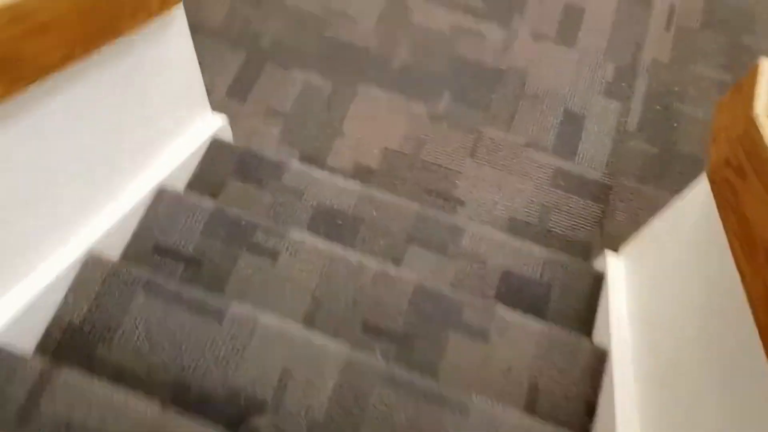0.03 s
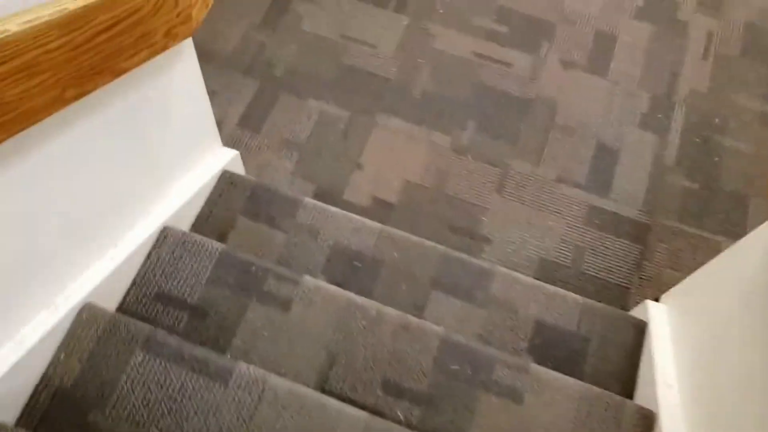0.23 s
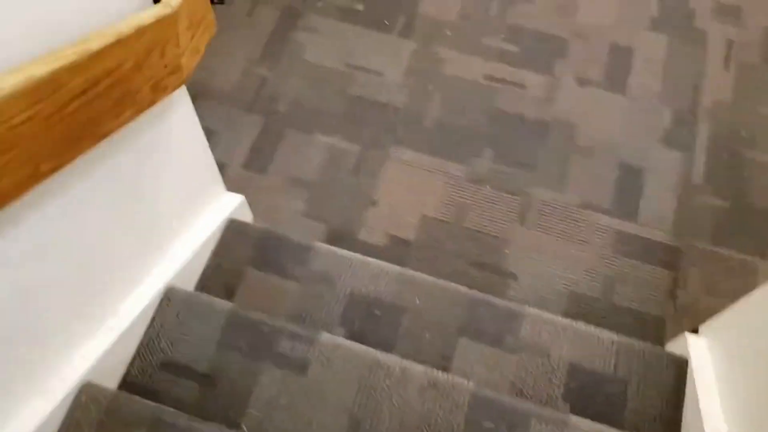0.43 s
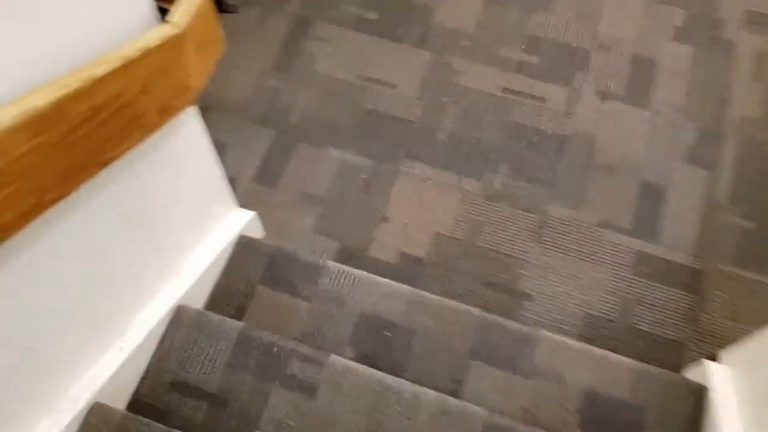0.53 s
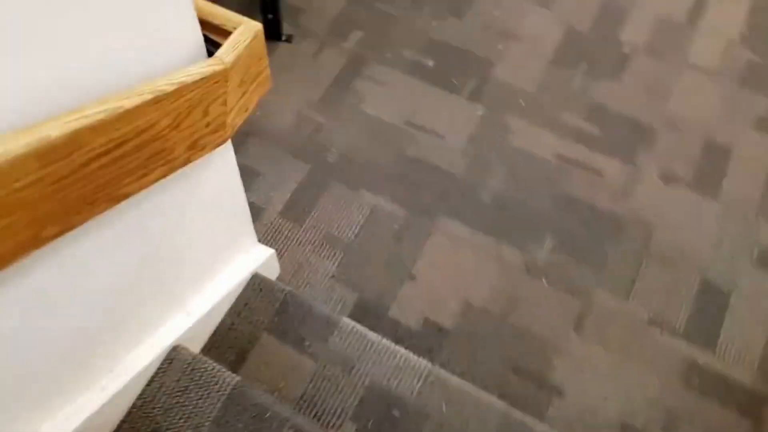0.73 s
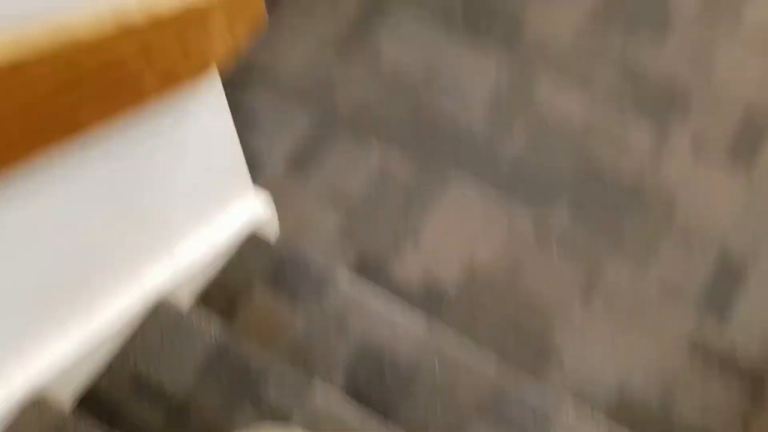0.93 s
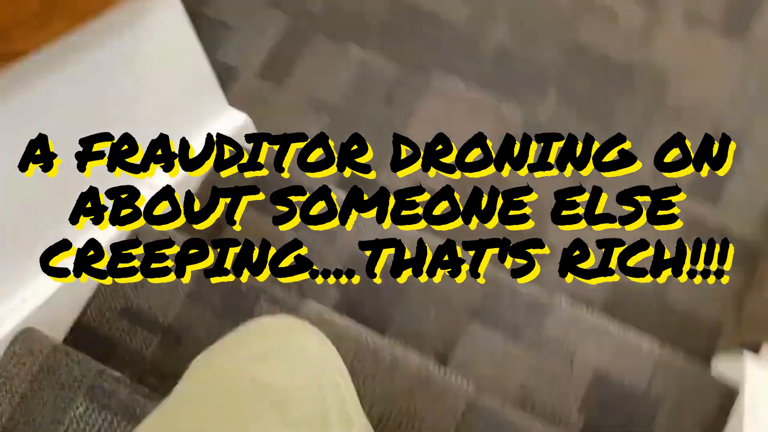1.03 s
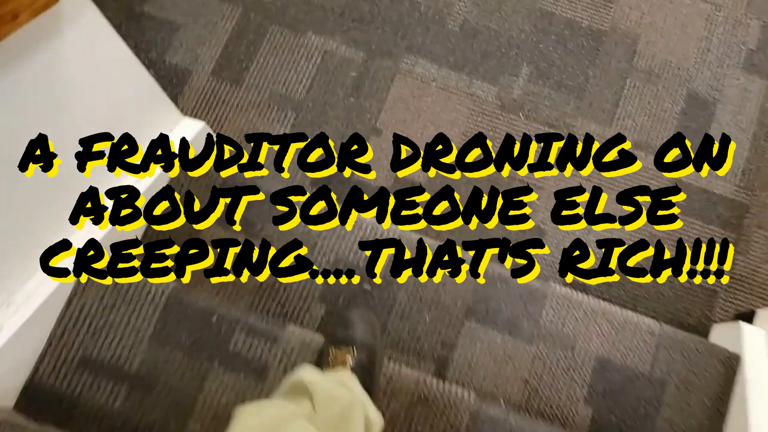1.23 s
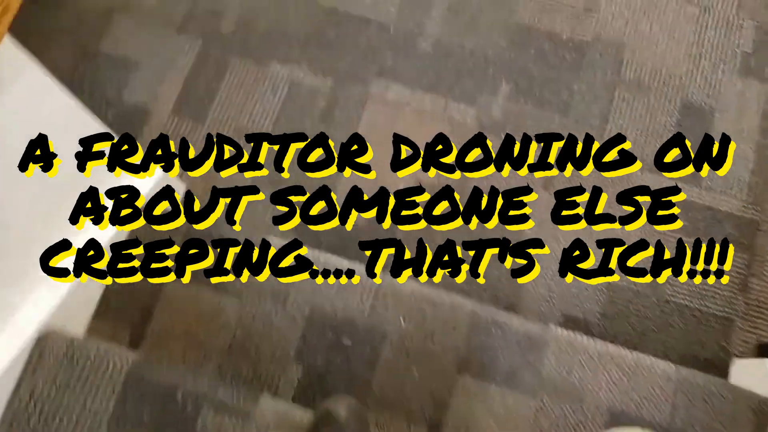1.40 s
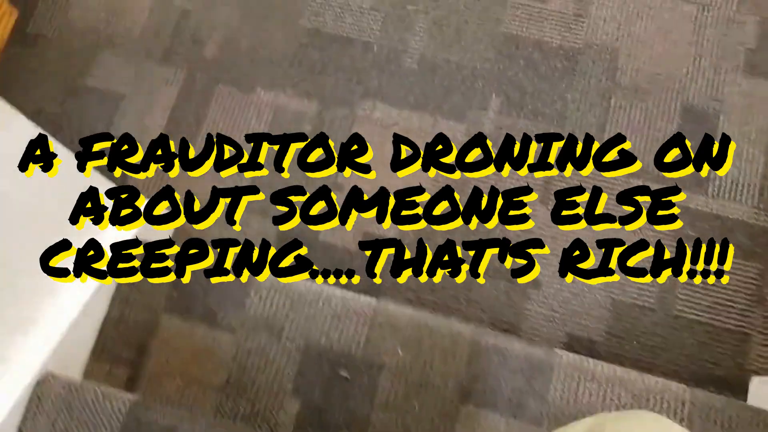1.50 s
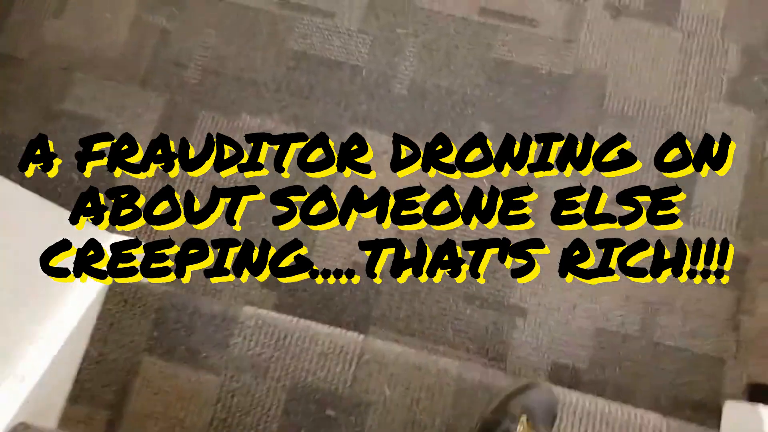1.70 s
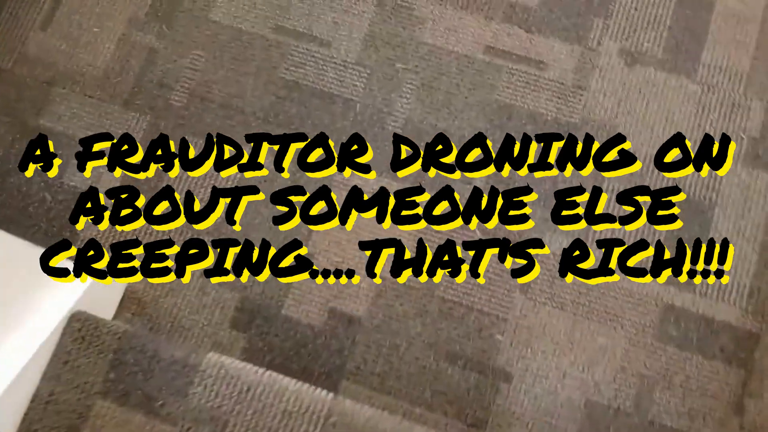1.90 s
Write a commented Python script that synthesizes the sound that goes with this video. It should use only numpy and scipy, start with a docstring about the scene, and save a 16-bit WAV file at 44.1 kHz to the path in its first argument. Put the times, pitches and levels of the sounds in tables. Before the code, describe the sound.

Three heavy footsteps go down carpeted wooden stairs, each a light clack and a dull boom, then a carpet brush. Trousers swish faintly and a hand bumps the walker's phone over a quiet indoor rumble.

```python
"""A carpeted wooden staircase: three heavy steps down, heard from a phone in the walker's hand.
At each step the sole clacks on the tread and the toe makes the stair and the stairwell boom;
then the sole brushes over the carpet and the heel settles. Trousers swish between the steps,
the hand bumps the phone, and the building rumbles quietly."""
import sys
import numpy as np
from scipy import signal
from scipy.fft import rfft, irfft
from scipy.io import wavfile
from scipy.ndimage import uniform_filter1d

SR = 44100
rng = np.random.default_rng(int(sys.argv[2]) if len(sys.argv) > 2 else 0)


def inscribe(sig):
    """Save sig as 16-bit PCM at rate SR to the path in sys.argv[1].

    A 1-D sig is mono; a 2-D sig holds one channel per row.
    Samples are clipped to [-1, 1] before scaling.
    """
    pcm = np.round(np.clip(np.atleast_2d(sig).T, -1, 1) * 32767)
    wavfile.write(sys.argv[1], SR, pcm.astype(np.int16))


N = 85995

# toe strikes: t/s, push/dB, contact/ms, boom/dB, tap/dB, tap pitch/Hz, carpet crush/dB,
# board ring/dB, tap contact/ms
STEPS = [(.4200, 0, 4.16, -40, -48, 1030, -70, -50, 1.25),
         (0.9454, 1, 3.68, -43, -52, 790, -54.5, -61, 4.5),
         (1.4959, 2, 3.2, -42, -40, 1230, -57.5, -48, 0.29)]
# heels settling: t/s, push/dB, contact/ms, boom/dB
HEELS = [(0.531, -7.5, 6.46, -49), (1.044, 1, 9, -45), (1.590, -4, 4.84, -55)]
BALL_DELAY_S = 0.0126  # the ball of the foot lands just after the toe


def undb(db):
    """Turn decibels into a gain to multiply by."""
    return 10 ** (np.asarray(db) / 20)


def curve(points):
    """Read a table of f/Hz, value at every frequency of the spectrum."""
    hz, value = np.array(points, float).T
    return np.interp(np.log(np.fft.rfftfreq(N, 1 / SR) + 1e-6), np.log(hz), value)


def bell(hz, width):
    """A bell shape of height 1 around one frequency."""
    return np.exp(-((np.fft.rfftfreq(N, 1 / SR) - hz) / width) ** 2)


def shade(x, db):
    """Turn each frequency up or down, with a filter that never rings ahead of the sound."""
    cepstrum = irfft(db * np.log(10) / 20, N)
    fold = 1 + np.sign(np.fft.fftfreq(N))
    response = np.atleast_2d(irfft(np.exp(rfft(cepstrum * fold)), N))
    return signal.fftconvolve(x, response[:, :N // 2], axes=1)[:, :N]


def brighten(x, db):
    """Turn the treble up or down."""
    return shade(x, db * curve([(2250, 0), (9000, 1)]))


def noise(spectrum):
    """Stereo noise of level 1 with the given tone colour."""
    # how alike left and right are: f/Hz, correlation
    likeness = [(60, 0.61), (400, 0.96), (800, 0.39), (1500, 0.017), (2500, 0.13), (4200, -0.16),
                (6500, -0.0035), (9000, 0.88), (15000, 0.91)]
    alike = np.clip(curve(likeness), -1, 1)
    mid, side = rfft(rng.standard_normal((2, N)))
    mid, side = mid * np.sqrt(1 + alike), side * np.sqrt(1 - alike)
    y = irfft(np.array([mid + side, mid - side]) * undb(curve(spectrum)), N)
    return y / y.std()


def wander(hz):
    """A smooth random wobble with a spread of 1."""
    hold = max(int(SR / hz), 2)
    y = uniform_filter1d(np.repeat(rng.standard_normal(N // hold + 1), hold), hold)[:N]
    return y / y.std()


def since(start):
    """Seconds gone by after a moment, zero before it."""
    return np.maximum(np.arange(N) / SR - start, 0)


def strike(start, rise, t60):
    """Loudness of a blow: a quick rise, then a fade of 60 dB every t60 seconds."""
    return np.minimum(since(start) / rise, 1) * np.exp(-np.log(1000) * since(start + rise) / t60)


def swells(strokes):
    """Loudness of rubbing strokes that swell and fade."""
    t = np.arange(N) / SR
    power = 0
    for at, db, rise, fall in strokes:
        shape = np.exp(np.where(t < at, -((t - at) / rise) ** 2, -since(at) / fall))
        power = power + (undb(db) * shape) ** 2
    return np.sqrt(power)


def ring(start, hz, t60):
    """One fading tone of a struck object."""
    t = since(start)
    return np.sin(2 * np.pi * hz * t) * np.exp(-np.log(1000) * t / t60)


def cushion(x, ms):
    """A soft contact spreads a blow over time, which dulls it."""
    length = ms * SR / 1000
    push = np.sin(np.pi * np.minimum(np.arange(int(length) + 1) / length, 1))
    return signal.fftconvolve(x, push / push.sum(), mode="same")


def building():
    """The building gives a steady low rumble and a faint hiss."""
    # tone colours of the rumble and the hiss: f/Hz, level/dB
    rumble = [(20, -11), (33, -14), (48, 7.5), (68, 0.5), (100, -3.5), (160, -8), (300, -13), (450, -22),
              (700, -39), (1500, -39), (6000, -72)]
    hiss = [(300, 2.5), (900, 1), (1500, 2), (2500, 0.5), (4500, -2.5), (7000, 4), (11000, 0), (15000, -6)]
    return undb(-58) * noise(rumble) + undb(-70) * noise(hiss)


def hand():
    """The hand bumps the phone, each time nearer one microphone; the phone rumbles as it shifts."""
    # bumps: t/s, left/dB, right/dB, f/Hz, ring time/s, contact/ms
    bumps = [(0.195, -25, -45.5, 82.4, 0.095, 4.7), (0.71, -46, -30, 71, 0.061, 4.8),
             (1.603, -62, -19.5, 103, 0.053, 2.9), (1.607, -46, -24.5, 332, 0.026, 2.05)]
    # tone colour of the shifting grip: f/Hz, level/dB
    grip = [(20, -26), (35, -10), (50, 5.5), (70, 4), (100, -12.5), (170, -22), (400, -35), (1200, -60),
            (4000, -100)]
    # shifts in the hand: peak t/s, level/dB, rise/s, fall/s
    shifts = [(.05, -49.5, 0.098, 0.17), (.375, -47, 0.085, 0.13), (.905, -47, 0.024, 0.042),
              (1.145, -43, 0.017, 0.039), (1.31, -49.5, 0.044, 0.14), (1.70, -53, 0.029, 0.67)]
    thuds = sum(undb([[left], [right]]) * cushion(ring(at, hz, t60), ms)
                for at, left, right, hz, t60, ms in bumps)
    return thuds + noise(grip) * swells(shifts)


def clothes():
    """Trouser legs swish as they pass, and clothing rubs dully as a leg swings; both flutter a little."""
    # tone colours of the bright swish and the dull rub: f/Hz, level/dB
    swish_colour = [(500, -22.5), (1200, -1), (2700, 6), (4500, 0), (7000, -2.5), (11000, -1.5),
                    (15000, -14.5)]
    rub_colour = [(100, 3), (200, -3.5), (310, 6.5), (420, -1), (600, -15), (800, -26.5), (1500, -30.5),
                  (4000, -26), (12000, -71)]
    # swishes: peak t/s, level/dB, rise/s, fall/s, left minus right/dB, treble/dB
    swishes = [(.008, -65, 0.016, 0.039, 2.5, -1.5), (0.221, -72, 0.059, 0.16, -1, -6),
               (.32, -67.5, 0.042, 0.076, -9, -12), (.53, -65.5, 0.055, 0.12, -4, 5.5),
               (.74, -64.5, 0.031, 0.083, -1, 3.5), (1.13, -72, 0.067, 0.095, -2, 8.5),
               (1.39, -77, 0.077, 0.21, 3, 6), (1.67, -68.5, 0.075, 0.05, -0.5, 4.5)]
    # leg swings: peak t/s, level/dB, rise/s, fall/s
    swings = [(.02, -67.5, 0.075, 0.3), (.22, -59.5, 0.055, 0.1), (.35, -56.5, .06, 0.056),
              (.61, -60, 0.037, 0.058), (1.23, -58.5, 0.094, 0.15), (1.73, -63.5, 0.15, 0.23)]
    swish = 0
    for *stroke, pan_db, treble_db in swishes:
        cloth = brighten(noise(swish_colour), treble_db)
        swish = swish + cloth * swells([stroke]) * undb([[pan_db / 2], [-pan_db / 2]])
    swish = swish * undb(1.6 * wander(hz=200))
    rub = noise(rub_colour) * swells(swings) * undb(1.9 * wander(hz=40.53))
    return swish + rub


def carpet():
    """Each step crushes the carpet fibres, then the sole brushes over them with a faint squeak."""
    # tone colour of the fibres: f/Hz, level/dB
    fibres = [(300, 8.5), (600, 7), (1000, 1.5), (1700, -2.5), (2700, -5), (4500, -8), (7000, -6.5),
              (11000, -9), (15000, -27)]
    # brushes of the sole: peak t/s, level/dB, rise/s, fall/s, squeak/Hz
    scuffs = [(0.487, -55.5, 0.056, 0.079, 3670), (.542, -55.5, 0.037, 0.016, 2470),
              (1.096, -58, 0.031, 0.021, 2600), (1.631, -57.5, 0.044, 0.019, 1730)]
    crush = sum(undb(db) * strike(at, rise=0.014, t60=0.77) for at, *_, db, _, _ in STEPS)
    out = brighten(noise(fibres), db=2) * crush
    for *stroke, hz in scuffs:
        squeak_db = 6.5 * bell(hz, width=hz / 4)
        out = out + shade(noise(fibres), squeak_db) * swells([stroke])
    grain = undb(wander(hz=350))
    return out * grain


def stairwell():
    """The stair and the walls ring on with a dull boom after each toe and heel."""
    # tone colour of the boom: f/Hz, level/dB
    boom = [(60, -23), (140, -3), (250, 4), (400, -3.5), (570, -7.5), (800, -18.5), (1300, -31),
            (2500, -27), (6000, -55), (14000, -83)]
    power = sum((undb(db) * strike(at, rise=0.004, t60=0.34)) ** 2 for at, _, _, db, *_ in STEPS + HEELS)
    return noise(boom) * np.sqrt(power)


def taps():
    """The rubber sole clacks just before the weight arrives; the boards ring and the walls answer."""
    # tones of the tread boards: f/Hz, ring time/s, level/dB
    board_tones = [(384, 0.097, 3.5), (500, 0.27, -3), (568, 0.17, 0.5), (620.4, 0.33, -7.5),
                   (920, 0.15, -19), (1142, 0.18, -8), (1274, 0.047, -7)]
    out = 0
    for at, _, _, _, tap_db, hz, _, board_db, contact_ms in STEPS:
        touch = at - .0025
        # tone colour of the tap, strongest at its pitch: f/Hz, level/dB
        colour = [(hz / 4, -8), (hz / 2 ** 0.46, -7), (hz, 0), (hz * 2 ** 0.46, -7),
                  (2800, -16), (4200, -30), (14000, -36)]
        rise = 0.00048 + contact_ms / 1000  # a softer contact starts more slowly
        toe = strike(touch, rise, t60=0.013)
        ball = undb(-24) * strike(touch + BALL_DELAY_S, rise=0.0023, t60=0.013)
        walls = undb(-13.5) * strike(touch, 2 * rise, t60=0.37)
        clack = strike(touch, rise=0.0019, t60=0.0073) * np.sin(2 * np.pi * hz * since(touch))
        tap = (toe + ball + walls) * noise(colour) + undb(4) * clack
        boards = sum(undb(db) * ring(touch, board_hz, t60) for board_hz, t60, db in board_tones)
        out = out + undb(tap_db) * tap + undb(board_db) * cushion(boards, contact_ms)
    return out


def stairs():
    """Toe, ball and heel push the treads through the carpet: a short knock, then the stair's low tones."""
    # tones of the staircase: f/Hz, ring time/s, then level/dB under each of the three steps
    stair_tones = [(44.1, 0.51, -59, -41, -41.5), (69, 0.33, -23, -28.5, -30),
                   (96.6, 0.14, -25, -31, -27.5), (124.6, 0.35, -39, -33.5, -34.5),
                   (149.3, 0.28, -29.5, -45, -33.5), (166.95, .28, -32.5, -26.5, -29),
                   (203.1, 0.22, -29.5, -42.5, -27), (255.3, 0.28, -34, -37, -36.5),
                   (290.3, 0.18, -33, -40, -53), (339, 0.24, -33, -33, -41)]
    knock_hz, knock_t60_s = 120, 0.018
    out = 0
    for tread, (toe, heel) in enumerate(zip(STEPS, HEELS)):
        for at, push_db, contact_ms, *_ in (toe, heel):
            tones = sum(undb(levels[tread]) * ring(at, hz, t60) for hz, t60, *levels in stair_tones)
            build_up = 1 - np.exp(-since(at) / 0.003)
            knock = ring(at, knock_hz, knock_t60_s)
            knock = knock + undb(2) * ring(at + BALL_DELAY_S, knock_hz, knock_t60_s)
            out = out + undb(push_db) * cushion(tones * build_up + undb(-24.5) * knock, contact_ms)
    return out


def scene():
    """Everything that reaches the phone."""
    return stairs() + stairwell() + taps() + carpet() + clothes() + hand() + building()


def record(dry):
    """The phone's two microphone holes each colour the sound their own way; the highest treble is cut."""
    # tone colour that both sides share: f/Hz, level/dB
    shared_colour = [(22, -22.5), (40, 3), (3400, 1.5), (4000, -1.5), (5500, -3), (7400, -2), (9300, -6.5),
                     (15000, 0.5)]
    # how the sides differ: f/Hz, left minus right/dB
    balance = [(60, -2.3), (400, -1.5), (700, 0), (1280, 3), (2360, 12), (3300, 10), (4500, -2),
               (8000, -0.5), (15000, 1)]
    # a narrow treble dip for each hole, left then right: f/Hz, width/Hz, level/dB
    dips = [(8560, 510, -11.5), (7790, 800, -27.5)]
    dips_db = np.array([db * bell(hz, width) for hz, width, db in dips])
    heard = shade(dry, curve(shared_colour) + np.array([[.5], [-.5]]) * curve(balance) + dips_db)
    top_hz = 15300
    return signal.sosfilt(signal.ellip(10, .2, 80, top_hz, fs=SR, output="sos"), heard)


dry = scene()
out = record(dry)
inscribe(out)
```